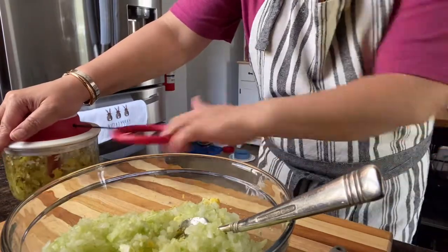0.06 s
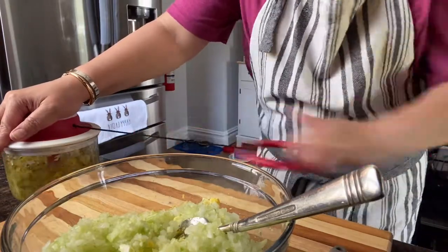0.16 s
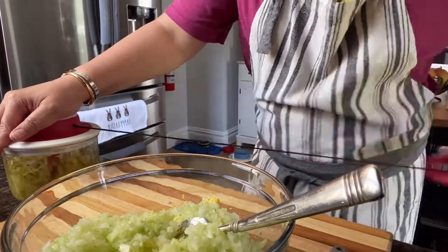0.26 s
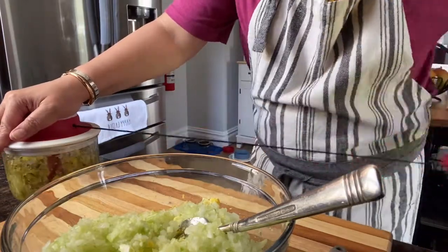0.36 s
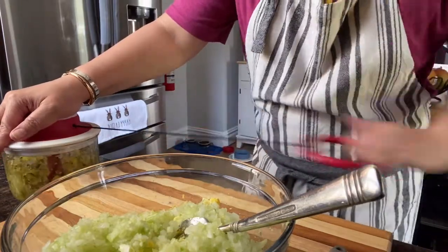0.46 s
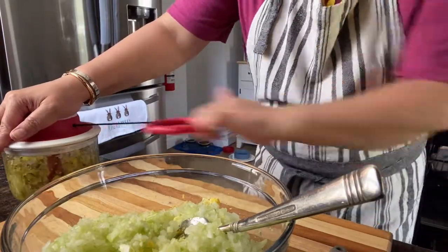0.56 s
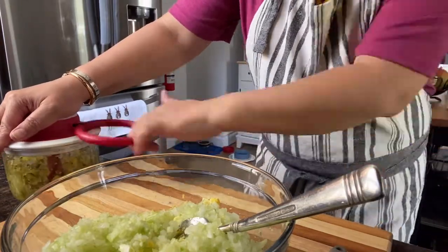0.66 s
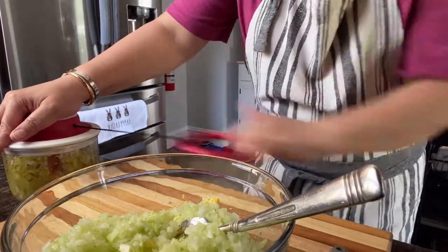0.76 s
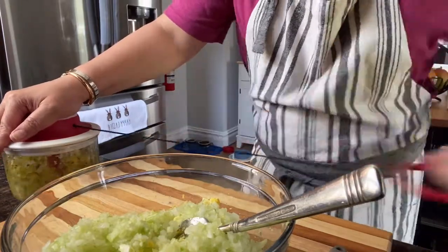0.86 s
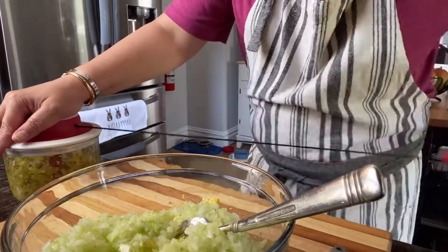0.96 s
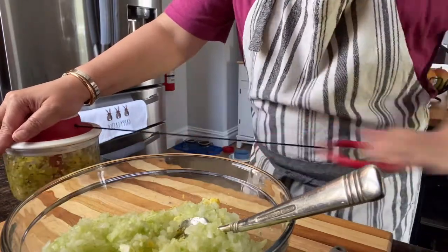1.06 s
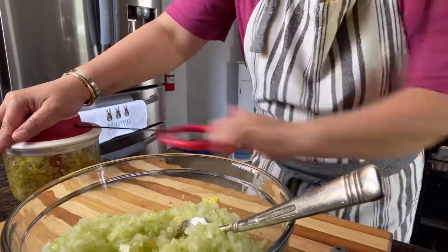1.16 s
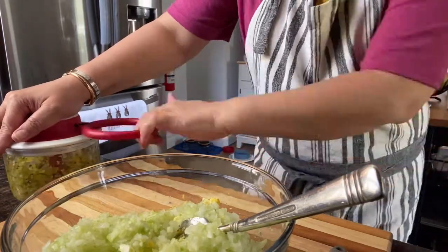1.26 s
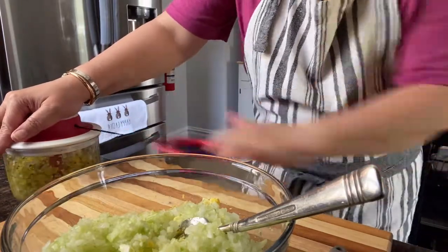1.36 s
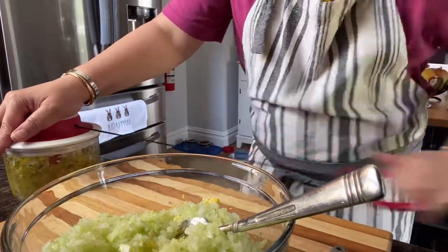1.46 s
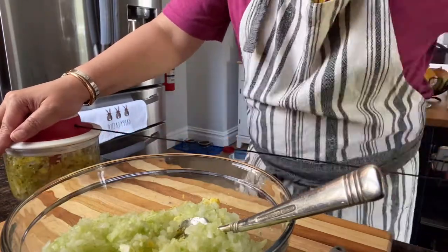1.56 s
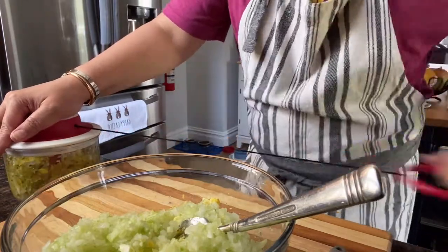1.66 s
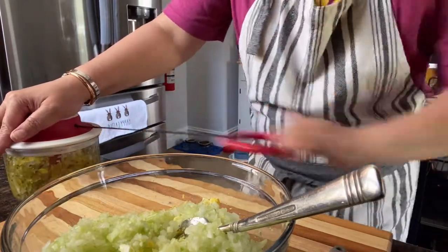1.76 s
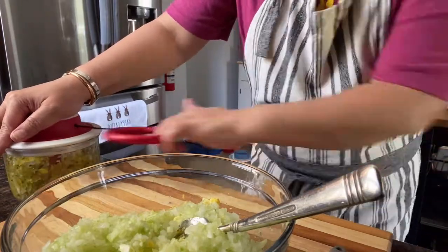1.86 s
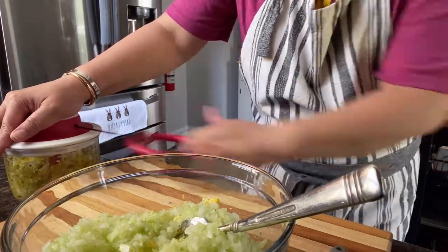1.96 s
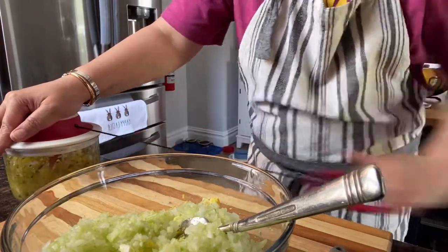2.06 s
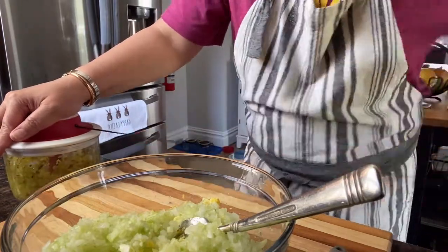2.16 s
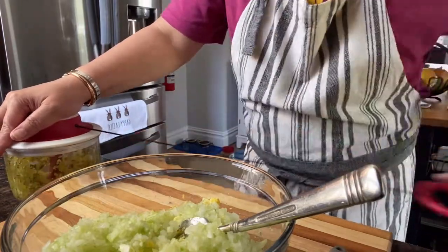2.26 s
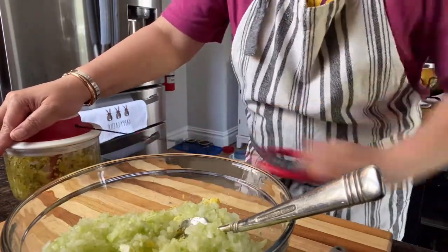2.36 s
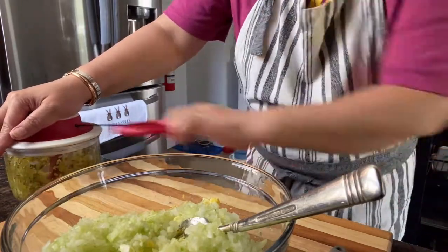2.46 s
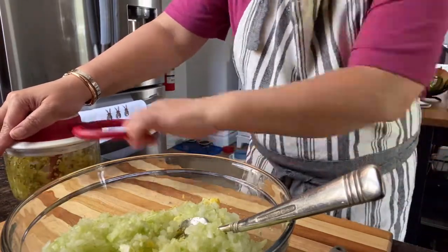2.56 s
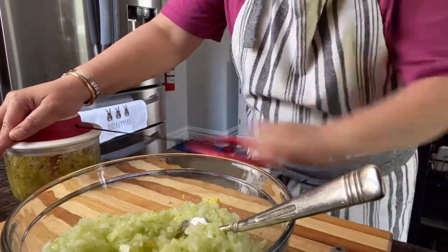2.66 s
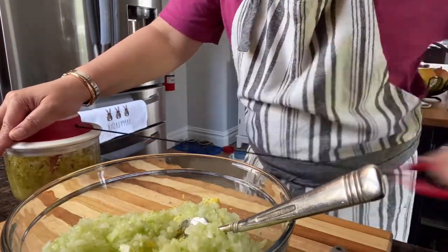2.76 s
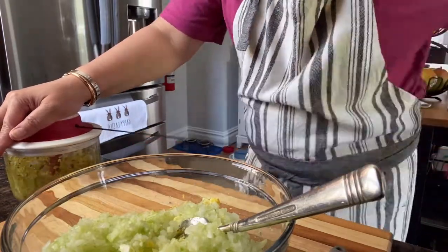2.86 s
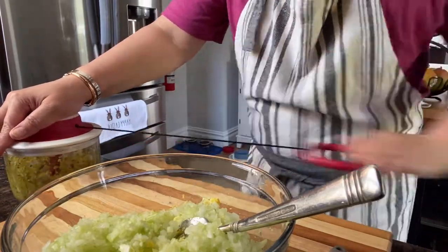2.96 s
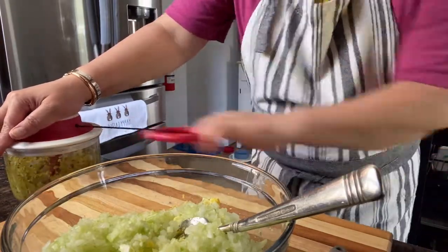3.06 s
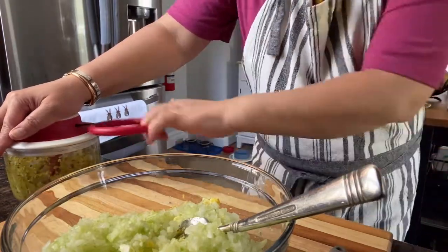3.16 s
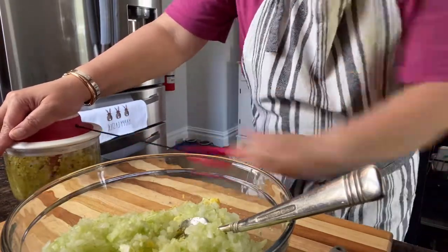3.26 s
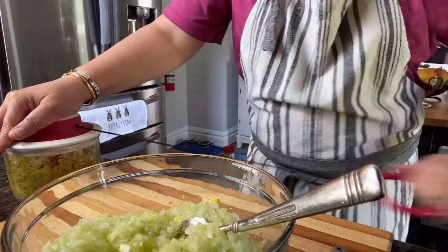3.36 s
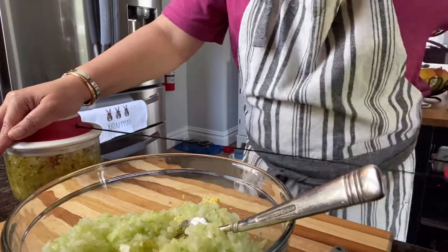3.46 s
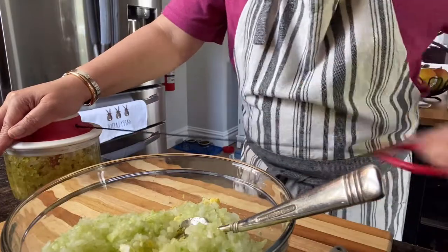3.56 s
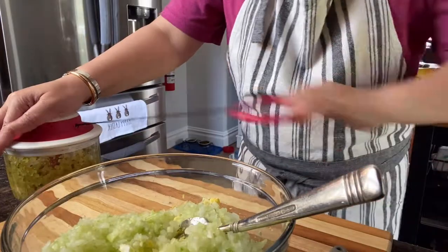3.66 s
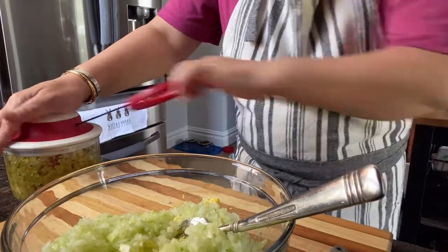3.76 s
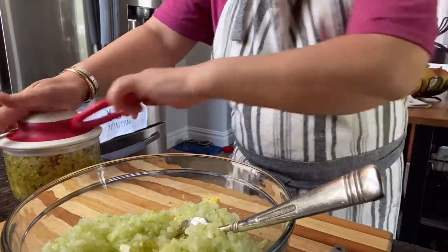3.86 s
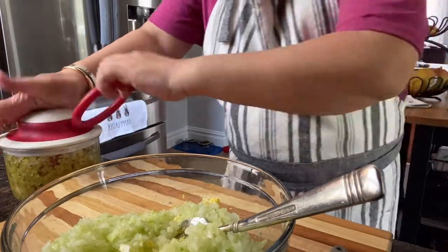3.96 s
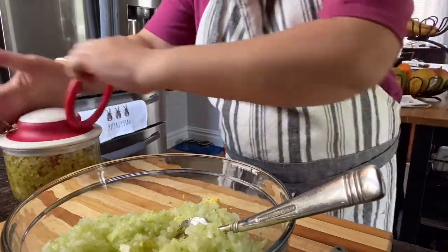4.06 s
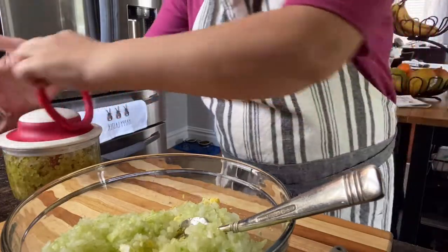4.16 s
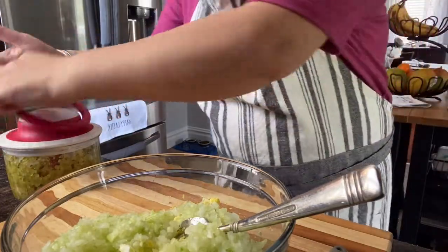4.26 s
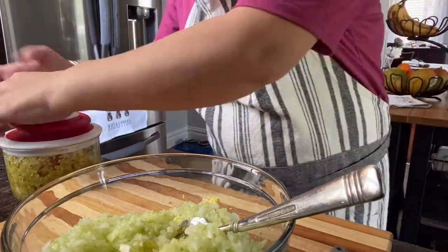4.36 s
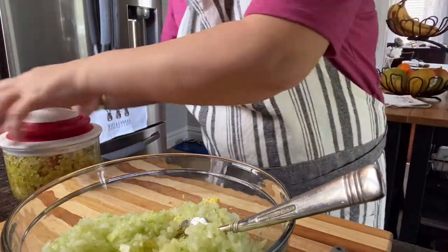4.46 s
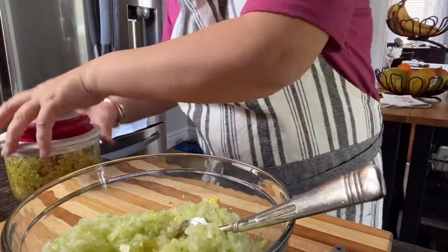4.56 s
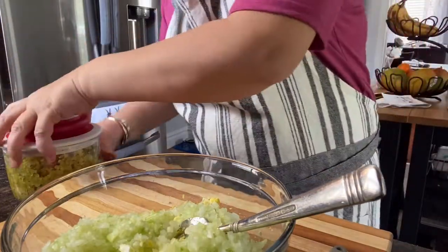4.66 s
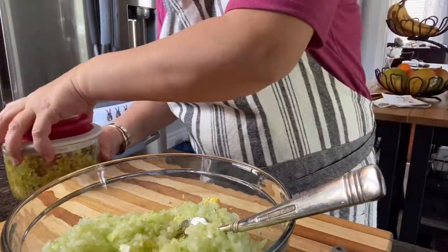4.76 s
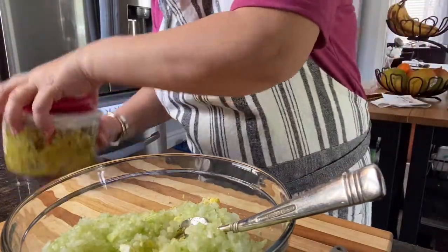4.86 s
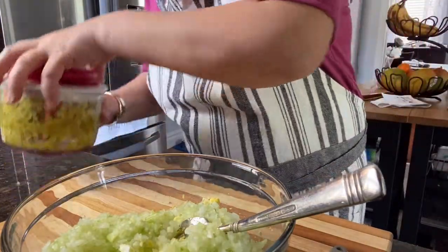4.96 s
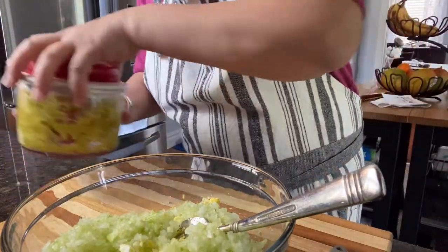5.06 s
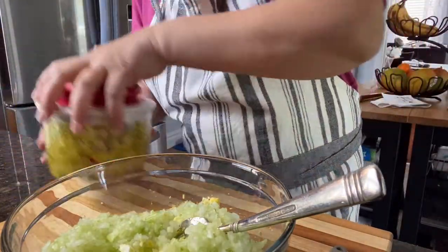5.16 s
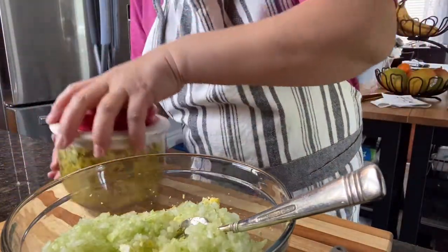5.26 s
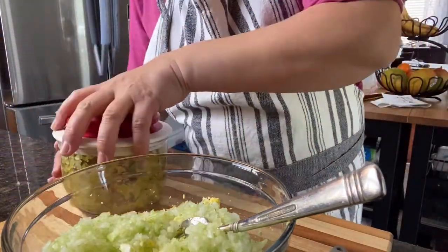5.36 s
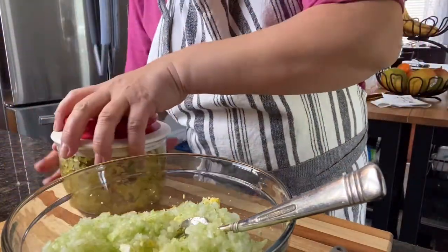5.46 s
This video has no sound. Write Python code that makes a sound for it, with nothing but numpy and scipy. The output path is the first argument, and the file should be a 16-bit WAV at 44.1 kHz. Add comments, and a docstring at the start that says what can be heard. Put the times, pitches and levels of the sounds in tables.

```python
"""Pull-cord chopper on a kitchen counter

Six pulls mince pickles in a plastic tub, left of the microphones, and each is followed by the cord rewinding.
Grains ringing the tub make the whir, the crunch and the rasp of cord on spool; noisy blows make knocks and clinks.
Then the handle is laid on the lid, fingers brush the plastic, and the tub bumps down beside a glass bowl.
Random reflections place it all in the kitchen, over appliance rumble, hiss and a faint tone."""
import sys
import numpy as np
from scipy import signal
from scipy.fft import rfft, irfft, next_fast_len
from scipy.io import wavfile
from scipy.ndimage import uniform_filter1d

SR = 44100
rng = np.random.default_rng(int(sys.argv[2]) if len(sys.argv) > 2 else 0)


def master_out(mix):
    """Clip the mix to full scale and print it as 16-bit PCM to the path in sys.argv[1]."""
    frames = np.transpose(np.atleast_2d(mix))
    ceiling = np.clip(frames, -1, 1)
    pcm = np.round(ceiling * 32767).astype(np.int16)
    wavfile.write(sys.argv[1], SR, pcm)


N = 243431
TIME = np.arange(N) / SR

# The pulls, each starting with a knock as the drive takes up. Each row: start in seconds, speeding up
# in seconds, effort in dB, then the knock: relative levels of thud, hollow body and crack in dB,
# body pitch in Hz, crack pitch in Hz.
PULLS = [(0.057, 0.169, -1, -20.5, -22.5, -26, 1350, 2185), (0.684, 0.186, 1, -22, -19, -25.5, 650, 2314),
         (1.289, 0.1865, 0.5, -19.5, -40, -35.5, 624, 2616),
         (1.921, 0.1737, 1, -15, -36.5, -24.5, 755, 2099), (2.573, 0.175, -0.5, -16, -12, -26, 692, 1550),
         (3.189, .16, 0, -32, -19, -23, 687, 2648)]
# The spring winding the cord back. Each row: start in seconds, length in seconds, effort in dB.
REWINDS = [(0.36, 0.2898, 0), (0.97, 0.29, 0.5), (1.612, 0.2803, 0), (2.231, 0.301, 0),
           (2.853, 0.3004, -0.5), (3.493, 0.27, -2.5), (3.707, 0.2226, -16)]
# Colour of ticks and of brushing skin. Each row: frequency in Hz, relative level in dB.
TICK = [(500, 4.5), (2000, 12.5), (3500, 11), (8000, -0.5), (13000, -10), (16000, -33)]
PELT_HZ = (598, 873)  # range of the hollow notes of the wall under the wet pieces
SLACK_S = 0.02  # time in which a pull takes up the slack


def chopper(count=3):
    """Sound leaves the tub from several spots around its wall, each with its own reflections."""
    # The loudest knocks of drive, blades and handle. Each row: time in seconds, relative levels of
    # thud, hollow body and crack in dB, body pitch in Hz, crack pitch in Hz.
    loud_knocks = [(0.09, -22, -25, -46, 760, 1776), (0.191, -10.5, -31, -28.5, 667, 2702),
                   (0.226, -20, -17.5, -28.5, 702, 2648), (0.458, -11, -51.5, -30, 667, 2175),
                   (0.553, -29.5, -37, -27.5, 632, 2282), (0.593, -35, -23.5, -20.5, 925, 3380),
                   (0.609, -48, -28, -29, 1173, 3244), (0.817, -16.5, -21.5, -36, 626, 2238),
                   (0.844, -23, -19, -28, 733, 2873), (1.066, -20.5, -39.5, -26.5, 640, 2530),
                   (1.113, -32, -24.5, -23.5, 630, 2624), (1.164, -37, -41.5, -30, 635, 2282),
                   (1.209, -27, -21.5, -26, 927, 4420), (1.222, -24, -24, -19, 654, 3333),
                   (1.425, -28, -20, -43, 703, 2088), (1.476, -14, -20, -29, 593, 2508),
                   (1.711, -15, -36, -31.5, 726, 2095), (1.753, -11.5, -31, -25, 650, 3283),
                   (1.862, -20, -29, -27, 1370, 1722), (2.055, -17, -22, -35, 740, 2260),
                   (2.091, -14, -16, -22.5, 660, 2497), (2.328, -20, -26, -27, 725, 2691),
                   (2.373, -16.5, -35, -24.5, 635, 2390), (2.486, -19, -24, -29.5, 650, 2622),
                   (2.589, -16.5, -17, -27.5, 710, 2590), (2.672, -36, -22.5, -28.5, 650, 2347),
                   (2.713, -14, -20.5, -25, 626, 2570), (2.744, -20.5, -19.5, -21, 646, 2710),
                   (2.954, -12.5, -24, -20.5, 705, 2478), (2.998, -19, -28.5, -25.5, 624, 2714),
                   (3.322, -16.5, -23.5, -29.5, 714, 2619), (3.358, -12.5, -20, -19.5, 663, 2560),
                   (3.606, -22.5, -20.5, -22, 694, 2450), (3.664, -10.5, -21.5, -22, 1110, 4260),
                   (3.746, -9.5, -22, -19, 740, 2400), (3.824, -30, -24, -25, 613, 3154)]
    # The blade shaft clinking in its seat. Each row: time in seconds, relative level in dB, pitch in Hz.
    shaft_clinks = [(1.4381, -13.5, 5350), (1.8088, -25, 5370), (1.9789, -18, 5700), (2.0208, -11, 5130),
                    (2.0552, -12, 5133), (2.5925, -17.5, 5180), (2.6394, -16.5, 5430), (2.6793, -13, 5060),
                    (3.2884, -13.5, 5300), (3.3593, -19, 5400), (3.824, -20.5, 4920)]
    load = strokes(pull_db=-30.5, pull_power=2.5, rewind_db=-32.5, rewind_power=2)
    blade_work = strokes(pull_db=-27.5, pull_power=1.36, rewind_db=-30.5, rewind_power=0.97)
    chopping = np.hypot(tumbling(blade_work), settling())
    running = strokes(pull_db=-36.5, pull_power=1.71, rewind_db=-37.5, rewind_power=1.4)
    # the spool is never quite still while the food settles
    cord = np.hypot(running, creeping()) + amp(-13.5) * settling()
    sweep = blade_sweep(chopping)
    pull_knocks = [(start, *knock) for start, rise_s, db, *knock in PULLS]
    hits = pull_knocks + loud_knocks + rattles()
    total = 0
    for spot in range(count):
        blows_here = knocks(hits[spot::count]) + clinks(shaft_clinks[spot::count])
        total = total + kitchen(whir(sweep, load, chopping, cord) + blows_here)
    return total


def whir(sweep, load, chopping, cord):
    """Pieces of pickle crunch and pelt the wall in step with the blades while the cord runs over the spool."""
    # Colours of the layers. Each row: frequency in Hz, relative level in dB.
    thrum_colour = [(40, -31), (110, -18.5), (165, -1.5), (235, -1), (320, -6), (450, -12), (600, -46.5),
                    (1500, -58.5)]
    chop_colour = [(150, -29), (430, -2.5), (520, -2.5), (640, -0.5), (780, -7.5), (1150, 1), (1500, -15),
                   (2400, -22), (9000, -45.5)]
    crunch_colour = [(500, -30), (1550, -8.5), (2100, 6), (2800, 3.5), (3700, -4), (5000, -5), (14000, -39)]
    rasp_colour = [(300, -10), (1000, 3), (2700, 7.5), (3800, 4.5), (5300, -2.5), (8300, 5), (10000, 0),
                   (14000, -8), (15500, -41)]
    cord_ring_db = -36  # the cord and the snapping pieces ring the tub only weakly
    pelts = pings(per_s=200, spread_db=3.0, low_hz=PELT_HZ[0], high_hz=PELT_HZ[1], t60=0.042, ring_db=-36)
    snaps = pings(per_s=110, spread_db=3.5, low_hz=1100, high_hz=4200, t60=0.024, ring_db=-16)
    scrapes = pings(per_s=430, spread_db=2.5, low_hz=1800, high_hz=13500, t60=0.017, ring_db=-12)
    # each layer swings by so many dB with the turning blades
    thrum = colour(tub(grains(700, 2.6) * amp(5.5 * sweep)), thrum_colour)
    chop = colour(tub(pelts * amp(2.8 * sweep)), chop_colour)
    crunch = colour(tub(snaps, cord_ring_db) * amp(4.9 * sweep), crunch_colour)
    rasp = colour(tub(scrapes, cord_ring_db) * amp(1.82 * sweep), rasp_colour)
    crisp = np.sqrt(chopping * cord)  # crisp only while the cord drives the blades
    return (amp(-5.5) * load * unit_rms(thrum)
            + amp(-7.5) * chopping * unit_rms(chop)
            + amp(-7.5) * crisp * unit_rms(crunch)
            + amp(-2.0) * cord * unit_rms(rasp))


def blade_sweep(chopping, top_hz=29, wander=0.1202):
    """A swing for every turn of the blades, which spin faster under a harder pull."""
    effort = uniform_filter1d(chopping, SR // 10).clip(0)
    unevenness = unit_rms(uniform_filter1d(rng.standard_normal(N), SR // 20))
    turns_per_s = top_hz * (effort / effort.max()) ** .25 * (1 + wander * unevenness)
    return np.cos(2 * np.pi * np.cumsum(turns_per_s) / SR)


def strokes(pull_db, pull_power, rewind_db, rewind_power):
    """A layer's gain through all pulls and rewinds: effort times a power of the spool's speed."""
    out = np.zeros(N)
    for start, rise_s, db, *knock in PULLS:
        add(out, start - SLACK_S, amp(pull_db + db) * pull_speed(rise_s) ** pull_power)
    for start, length, db in REWINDS:
        add(out, start, amp(rewind_db + db) * arch(length, skew=0.62) ** rewind_power)
    return out


def pull_speed(rise_s, jerk_share=0.44, run_down_s=0.0543):
    """A pull jerks the spool to a share of its top speed, speeds it up, then lets it run down."""
    t = np.arange(SR // 2) / SR - SLACK_S
    driven = np.interp(t, [-SLACK_S, 0, rise_s], [0, jerk_share, 1])
    return driven * np.exp(-np.maximum(t - rise_s, 0) / run_down_s)


def arch(length, skew):
    """Rises from zero to one and falls back; a skew under one peaks early."""
    return np.sin(np.pi * np.linspace(0, 1, round(length * SR), endpoint=False) ** skew)


def tumbling(gain, slosh_db=-12.5, slosh_s=0.055):
    """The food goes on moving for a moment after the blades slow."""
    keep = np.exp(-1 / (slosh_s * SR))
    return np.hypot(gain, amp(slosh_db) * signal.lfilter([1 - keep], [1, -keep], gain))


def settling(settle_db=-45.5, fade_s=0.057):
    """Gain of the settling food: steady at first, dying away from the middle of the last rewind."""
    start, length, db = REWINDS[-1]
    return amp(settle_db) * np.exp(-np.maximum(TIME - start - length / 2, 0) / fade_s)


def creeping(creep_db=-55, ease_s=0.025):
    """Gain of the creeping slack cord, from the middle of each rewind to the next pull."""
    slack = np.zeros(N)
    for (start, length, db), next_pull in zip(REWINDS, PULLS[1:]):
        slack += (TIME > start + length / 2) * (TIME < next_pull[0])
    return amp(creep_db) * uniform_filter1d(slack, round(ease_s * SR))


def knocks(rows, body_t60=0.037, crack_t60=0.0061):
    """The drive hits its stops and blades crack firm pieces; each blow has its own body and crack pitch."""
    # Colours of the three parts. Each row: frequency in Hz, relative level in dB.
    thud_colour = [(40, -25.5), (110, -0.5), (180, 9), (300, 4.5), (500, -19), (1200, -53.5)]
    hollow_colour = [(150, -31), (450, -6.5), (680, -4), (1000, -2.5), (1350, -8.5), (1800, -39.5),
                     (5000, -41)]
    crack_colour = [(500, -25.5), (1400, 1), (2200, 9), (3200, 4), (4200, 3), (5500, -0.5), (8000, -1.5),
                    (12000, -7), (16000, -55)]
    out = np.zeros(N)
    for s, thud_db, body_db, crack_db, body_hz, crack_hz in rows:
        force = contact(chatter_s=.001, chatter_db=8.5)
        thud = colour(tub(force), thud_colour)
        body = colour(ringing(force, [(body_hz, 0, body_t60)], ring_db=-25.5), hollow_colour)
        crack = colour(ringing(force, [(crack_hz, 0, crack_t60)], ring_db=-18.5), crack_colour)
        blow = amp(thud_db + 11.5) * unit_energy(thud)
        blow += amp(body_db + 20.0) * unit_energy(body)
        blow += amp(crack_db + 23.0) * unit_energy(crack)
        add(out, s, blow)
    return out


def rattles(count=80, per_s=15):
    """Rows of light knocks of scattered pitch, likelier and harder the faster the spool turns."""
    when, chance = rng.random((2, count))
    first, last = PULLS[0][0], REWINDS[-1][0]
    times = first + (last - first) * (np.arange(count) + when) / count
    vigour = np.interp(times, TIME, strokes(pull_db=0, pull_power=0.7, rewind_db=0, rewind_power=1.0))
    sizes_db = np.array([-24.5, -34, -38]) + 0.5 * rng.standard_normal((count, 3))  # thud, body, crack
    sizes_db += 20 * np.log10(vigour + 1e-9)[:, None]
    struck = chance < vigour * per_s * (last - first) / count
    body_hz, crack_hz = rng.uniform(*PELT_HZ, count), rng.uniform(2050, 3540, count)
    return list(np.column_stack([times, sizes_db, body_hz, crack_hz])[struck])


def clinks(rows, chatter_s=0.00036, width_hz=600, size=1500):
    """Short, bright chirps of the blade shaft, damped by the wet food."""
    out, t = np.zeros(N), np.arange(size) / SR
    note = t * np.exp(-np.pi * width_hz * t)
    for s, db, hz in rows:
        force = contact(chatter_s, chatter_db=11.0)
        chirp = signal.fftconvolve(force, note * np.sin(2 * np.pi * hz * t))
        add(out, s, amp(db + 10.5) * unit_energy(chirp))
    return out


def tub(x, ring_db=-30.0):
    """The plastic tub passes a force on and rings with it, damped by the food in it."""
    # Ringing of the tub. Each row: frequency in Hz, relative level in dB, t60 in seconds.
    tub_modes = [(169.1, -18, 0.2), (225.3, -22.5, 0.12), (456, -17, 0.079), (652, -17, 0.032),
                 (753.4, -9, 0.075), (913, -14, 0.086), (1786, 0.5, 0.04), (2101, -8.5, 0.088),
                 (2707, -2, 0.022), (5053, 15.5, 0.01)]
    return ringing(x, tub_modes, ring_db)


def ticks():
    """Small, sharp, dry clicks of the pawl and of fingers on the lid, and near the end of a glass or bracelet."""
    # Each row: time in seconds, relative level in dB.
    tick_rows = [(0.394, -20.5), (0.436, -25.5), (0.501, -18), (2.305, -20), (2.4247, -22), (2.4756, -22.5),
                 (2.801, -25.5), (3.05, -24), (3.105, -23.5), (3.12, -20.5), (4.7144, -59), (5.3785, -46),
                 (5.441, -44)]
    out = np.zeros(N)
    for s, db in tick_rows:
        click = colour(contact(chatter_s=0.0026, chatter_db=25.5), TICK)
        add(out, s, amp(db + 15.0) * unit_energy(click))
    return out


def handle_on_lid():
    """The handle drops on the lid and settles, ringing in its own modes."""
    # Each row: time in seconds, level in dB, brightness in dB per octave.
    taps = [(4.299, 3, 1.5), (4.308, -5, 0), (4.389, -10, -2.5)]
    # Colour of the taps. Each row: frequency in Hz, relative level in dB.
    tap_colour = [(100, -20), (300, 16), (900, 10), (1700, 5.5), (3000, 0.5), (4200, -6.5), (7000, -12.5),
                  (14000, -31)]
    # Ringing of the handle. Each row: frequency in Hz, relative level in dB, t60 in seconds.
    handle_modes = [(458, 1, 0.085), (690, 6.5, 0.03), (955, 0, 0.059), (1185, -3, 0.06), (1640, 11, 0.05),
                    (2085, 2, 0.04), (2970, 10, 0.028), (4960, 8, 0.035)]
    return blows(taps, tap_colour, handle_modes, ring_db=-39.5, chatter_s=0.0012)


def tub_on_counter():
    """The tub bumps down and the counter top rings with it."""
    # Each row: time in seconds, level in dB, brightness in dB per octave.
    bumps = [(5.304, -4.5, 2.5), (5.315, -5, 1), (5.515, -12, 0.5)]
    # Colour of the bumps. Each row: frequency in Hz, relative level in dB.
    bump_colour = [(40, -25), (130, -6), (260, -6.5), (380, -19.5), (750, -19), (1500, -30.5),
                   (3000, -36.5), (14000, -72.5)]
    # Ringing of the counter top. Each row: frequency in Hz, relative level in dB, t60 in seconds.
    counter_modes = [(502, -7, 0.05), (670, 4, 0.05), (920, -1, 0.05)]
    return blows(bumps, bump_colour, counter_modes, ring_db=-42.0, chatter_s=0.0045)


def blows(rows, spectrum, modes, ring_db, chatter_s):
    """Each blow rings the struck thing, with a brightness of its own."""
    out = np.zeros(N)
    for s, db, tilt_db in rows:
        force = colour(contact(chatter_s, chatter_db=1.5), spectrum, tilt_db)
        add(out, s, amp(db) * unit_energy(ringing(force, modes, ring_db)))
    return out


def rocking(width_hz=45, size=6000):
    """Soft, low thuds of the tub rocking on its base when it is touched or set down."""
    # Each row: time in seconds, level in dB, pitch in Hz.
    rocks = [(4.302, -5.5, 290), (4.386, -7.5, 400), (5.310, 1, 112), (5.333, -1, 156)]
    out, t = np.zeros(N), np.arange(size) / SR
    swell = t * np.exp(-np.pi * width_hz * t)
    for s, db, hz in rocks:
        add(out, s, amp(db) * unit_energy(swell * np.sin(2 * np.pi * hz * t)))
    return out


def fingers(skew=0.42):
    """Skin brushes the lid and the tub: dense grains under an early-peaking touch."""
    # Each row: start in seconds, length in seconds, relative level in dB.
    brushes = [(3.878, 0.42, -69.5), (4.232, 0.28, -70), (4.474, 0.22, -70.5), (4.709, .08, -74)]
    touch = np.zeros(N)
    for start, length, db in brushes:
        add(touch, start, amp(db) * arch(length, skew))
    skin = colour(grains(4000, 3.04), TICK, tilt_db=9.5)
    return amp(-1.5) * touch * unit_rms(skin)


def kitchen(x, near_t60=0.028):
    """One spot's path to the two microphone ports: left first, near echoes at once, walls later."""
    # Decay of the room. Each row: frequency in Hz, t60 in seconds.
    room_t60 = [(200, .33), (530, .32), (1400, .27), (3700, .25), (9700, .19)]
    # Wall echoes, then reflections of bowl and counter. Each row: frequency in Hz, level in dB.
    room_send = [(60, -8.5), (250, -3.5), (1000, -7.5), (5000, -6.5), (8000, -6.5), (10000, -39)]
    near_send = [(100, -21.5), (350, 5), (1000, 2), (3000, 2.5), (7500, 2), (9500, -4), (14000, 2)]
    # Balance of the ports. Each row: frequency in Hz, left minus right in dB.
    balance = [(60, 14), (160, 0), (230, 8), (400, 2), (700, 4), (1300, 4), (2400, 1.5), (3800, 3.5),
               (5000, -3), (6200, 1.5), (8200, 3.5), (11000, -2)]
    # The bowl shades the right port. Each row: frequency in Hz, extra phase lag in radians.
    shade = [(60, 0.37), (250, 0.063), (480, 1.85), (800, 0), (1300, 0.2), (2000, 0)]
    port_lag_s = 0.0001579
    size = 2 * next_fast_len(N // 2 + SR // 4, real=True)
    hz, source, ports = np.fft.rfftfreq(size, 1 / SR), rfft(x, size), []
    lead = 2 * np.pi * hz * port_lag_s + read(shade, hz)
    near_gain = np.hypot(1, amp(read(near_send, hz)))
    for side in (1, -1):  # left, right
        near = reflections(.0004, [(100, near_t60), (10000, near_t60)], near_send)
        far = reflections(.009, room_t60, room_send)
        direct = np.exp(1j * side * lead / 2)
        early = near_gain * evened(direct + rfft(near, size), 110)
        side_gain = amp(side * read(balance, hz) / 2)
        ports.append(irfft(source * (early + rfft(far, size)) * side_gain, size)[:N])
    return np.array(ports)


def reflections(start_s, t60, send, size=20000):
    """Sparse echoes of random sign, each band dying at its own speed."""
    taps = rng.choice([-1., 1.], size) * (rng.random(size) < 5000 / SR)  # about 5000 per second
    hz, t, z = signal.stft(taps, SR, nperseg=128)
    band_t60 = np.maximum(read(t60, hz), 1 / SR)[:, None]
    tail = signal.istft(z * np.exp(-np.log(1000) * t / band_t60), SR, nperseg=128)[1]
    return np.pad(colour(unit_energy(tail), send), (round(start_s * SR), 0))[:size]


def ambience(rumble_db=-45.0, hiss_db=-54, left_db=1.0):
    """A low rumble of kitchen appliances, one signal for both ports, under a diffuse hiss that swells."""
    # Swell of the hiss. Each row: time in seconds, relative level in dB.
    hiss_swell = [(4.1, 2.5), (4.6, 5), (5.0, 6), (5.5, 8.5)]
    rumble = amp(rumble_db) * drone(tilt_db=-5.0)
    hiss = amp(hiss_db) * np.array([drone(tilt_db=4.5) for port in range(2)])
    return amp([[left_db], [-left_db]]) * (rumble + hiss * level(hiss_swell))


def drone(tilt_db, waver_db=1.5):
    """Background noise with faint resonances, wavering slowly in level."""
    # Colour of the kitchen's background. Each row: frequency in Hz, relative level in dB per Hz.
    background = [(25, -25), (52, -4.5), (120, -8.5), (318, -16.5), (420, -25.5), (1090, -32.5),
                  (1400, -37.5), (2000, -43.5), (3200, -61), (5570, -77), (12400, -93)]
    # Its faint resonances. Each row: frequency in Hz, relative level in dB, t60 in seconds.
    background_modes = [(159, 1, 0.28), (221, -8.5, .25), (654, 11, .1)]
    waver = unit_rms(uniform_filter1d(rng.standard_normal(N), SR // 6))
    noise = ringing(rng.standard_normal(N), background_modes, ring_db=-57)
    return amp(waver_db * waver) * unit_rms(colour(noise, background, tilt_db))


def faint_tone(width_hz=75):
    """A narrow, airy tone wavers in the background: slow complex noise turned up to a gliding pitch."""
    # Each row: time in seconds, pitch in Hz, level in dB.
    tone = [(4.6, 1000, -75.5), (4.9, 1070, -61), (5.25, 1074, -57), (5.45, 1150, -59)]
    s, hz, db = np.transpose(tone)
    keep = np.exp(-np.pi * width_hz / SR)
    noise = rng.standard_normal((2, N)) + 1j * rng.standard_normal((2, N))
    flutter = signal.sosfilt([[1 - keep, 0, 0, 1, -keep, 0]] * 2, noise)
    turn = np.exp(2j * np.pi * np.cumsum(np.interp(TIME, s, hz)) / SR)
    return amp(np.interp(TIME, s, db)) * unit_rms((flutter * turn).real)


def contact(chatter_s, chatter_db, size=8000):
    """One blow, followed by a brief noisy chatter between the parts, evened in colour."""
    t = np.arange(size) / SR
    chatter = rng.standard_normal(size) * t * np.exp(-t / chatter_s)
    force = amp(chatter_db) * unit_energy(chatter)
    force[0] += 1
    return irfft(evened(rfft(force), 400))


def grains(per_s, spread_db):
    """Random tiny impacts of uneven size."""
    chance, size = rng.random((2, N))
    hit = np.flatnonzero(chance < per_s / SR)
    out = np.zeros(N)
    size_db = spread_db * np.minimum(-np.log(size[hit]), 3)
    out[hit] = amp(size_db) * rng.choice([-1, 1], N)[hit]
    return unit_rms(out)


def pings(per_s, spread_db, low_hz, high_hz, t60, ring_db):
    """Random tiny impacts, each ringing briefly at a pitch of its own."""
    clicks, hz = grains(per_s, spread_db), rng.uniform(low_hz, high_hz, N)
    t = np.arange(0, t60, 1 / SR)
    fade, out = amp(ring_db) * np.exp(-np.log(1000) * t / t60), clicks.copy()
    for i in np.flatnonzero(clicks):
        add(out, i / SR, clicks[i] * fade * np.cos(2 * np.pi * hz[i] * t))
    return out


def ringing(x, modes, ring_db, size=8000):
    """A body passes a force on and rings with it in its dying modes."""
    t = np.arange(size) / SR
    response = np.zeros(size)
    for hz, db, t60 in modes:
        response += amp(db + ring_db) * np.exp(-np.log(1000) * t / t60) * np.cos(2 * np.pi * hz * t)
    response[0] += 1
    return signal.oaconvolve(x, response)[:len(x)]


def colour(x, points, tilt_db=0, size=4096):
    """Causal minimum-phase filter with the given spectrum, tilted in dB per octave about 1 kHz."""
    hz = abs(np.fft.fftfreq(size, 1 / SR))
    octaves = np.log2(np.maximum(hz, 100) / 1000)
    log_gain = np.log(amp(read(points, hz) + tilt_db * octaves))
    taps = np.fft.ifft(np.exp(np.conj(signal.hilbert(log_gain)))).real[:size // 2]
    return signal.oaconvolve(x, taps)[:len(x)]


def evened(spectrum, width_hz):
    """Levels a spectrum over the given width, causally: the timing stays ragged, the colour turns neutral."""
    width = int(2 * len(spectrum) * width_hz / SR) + 1
    log_gain = -np.log(uniform_filter1d(abs(spectrum) ** 2, width) + 1e-9) / 2
    both_sides = np.r_[log_gain, log_gain[-2:0:-1]]
    return spectrum * np.exp(np.conj(signal.hilbert(both_sides)))[:len(spectrum)]


def amp(db):
    """Decibels to gain."""
    return 10 ** (np.asarray(db) / 20)


def unit_rms(x):
    """Scales to an rms of one."""
    return x / np.sqrt(np.mean(x ** 2) + 1e-20)


def unit_energy(x):
    """Scales to an energy of one."""
    return x / np.sqrt(np.sum(x ** 2, axis=-1, keepdims=True) + 1e-20)


def read(points, hz):
    """Reads a table on a log-frequency axis."""
    f, value = np.transpose(points)
    return np.interp(np.log(hz + 1), np.log(f + 1), value)


def level(table):
    """A dB curve as a gain for every sample."""
    return amp(np.interp(TIME, *np.transpose(table)))


def add(mix, s, sound):
    """Mixes a sound in at s seconds."""
    part = mix[max(round(s * SR), 0):][:len(sound)]
    part += sound[:len(part)]


def scene():
    """Chopper and handling sounds in the kitchen, over its background."""
    handling = ticks() + handle_on_lid() + tub_on_counter() + rocking() + fingers()
    return chopper() + kitchen(handling) + ambience() + faint_tone()


def record(dry):
    """The recorder's band limit at 16 kHz."""
    taps = signal.firwin(511, 16000, window=("kaiser", 9), fs=SR)
    return signal.oaconvolve(dry, taps[None], "same")


dry = scene()
out = record(dry)
master_out(out)
```